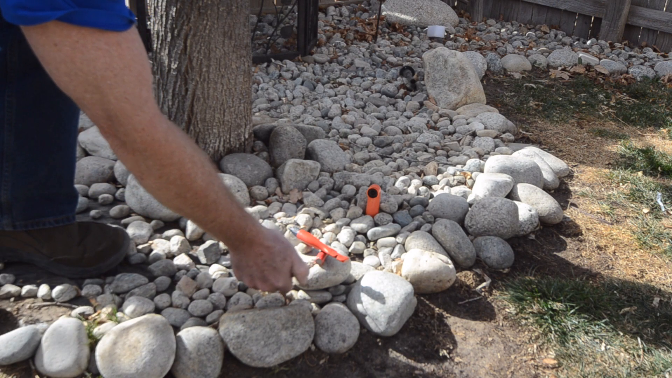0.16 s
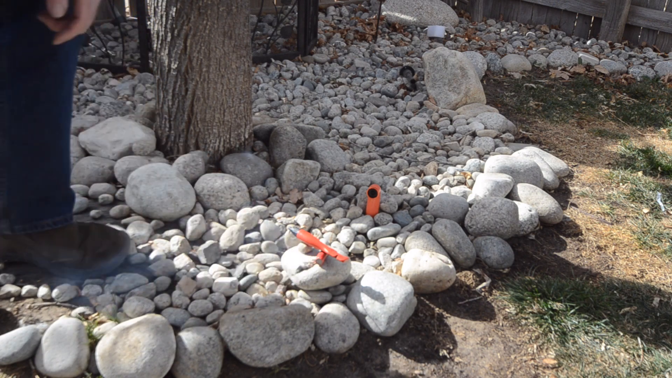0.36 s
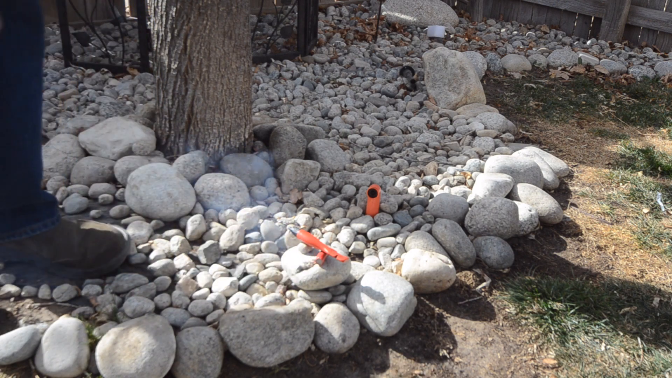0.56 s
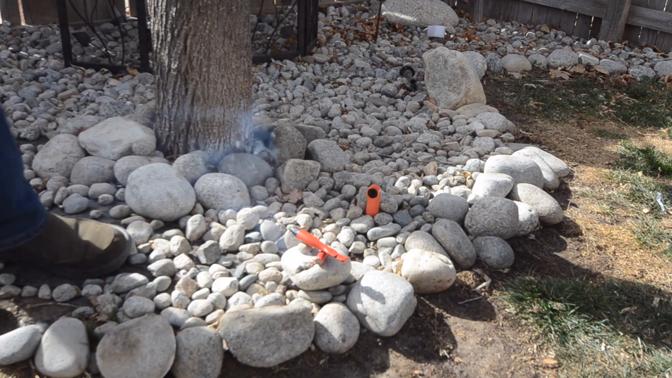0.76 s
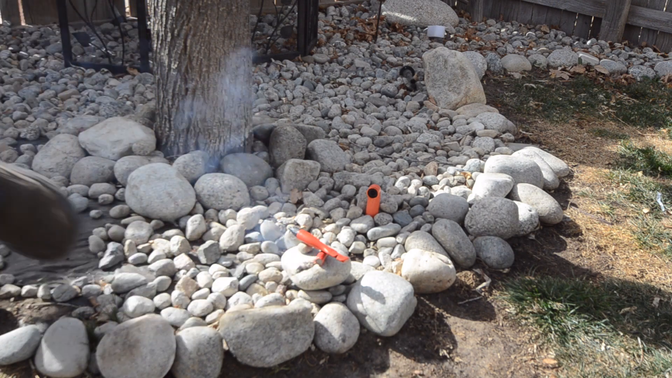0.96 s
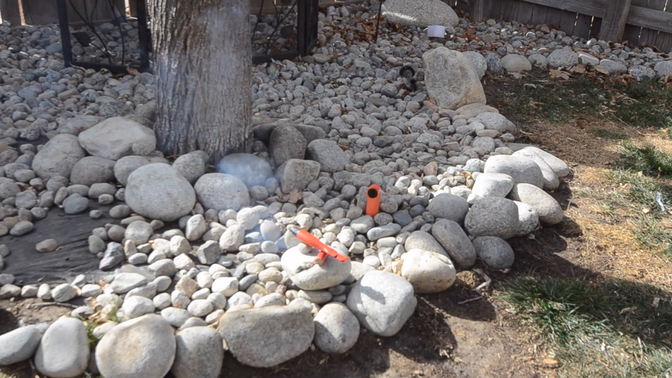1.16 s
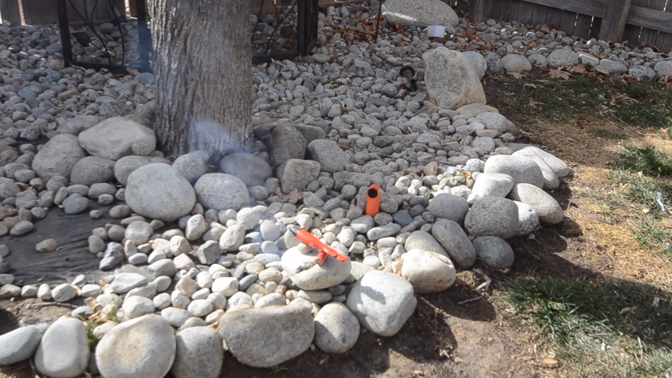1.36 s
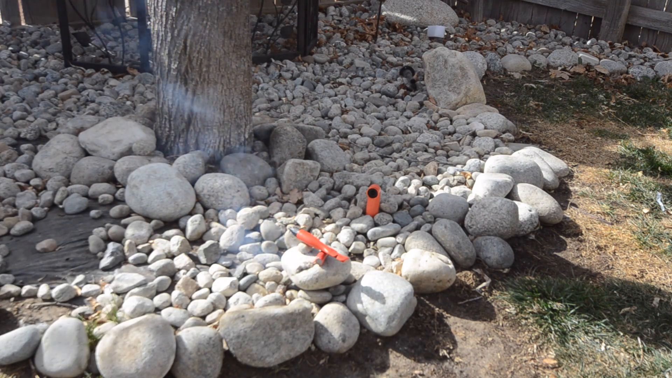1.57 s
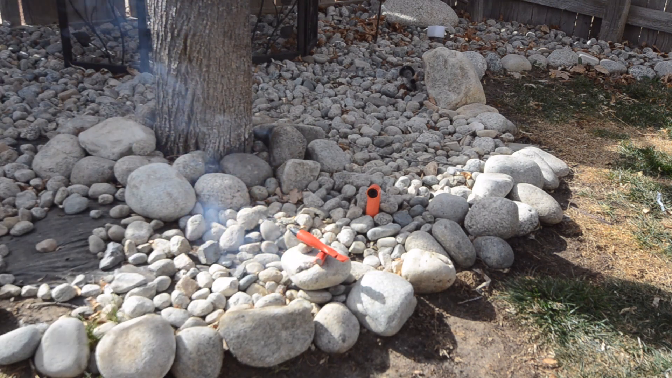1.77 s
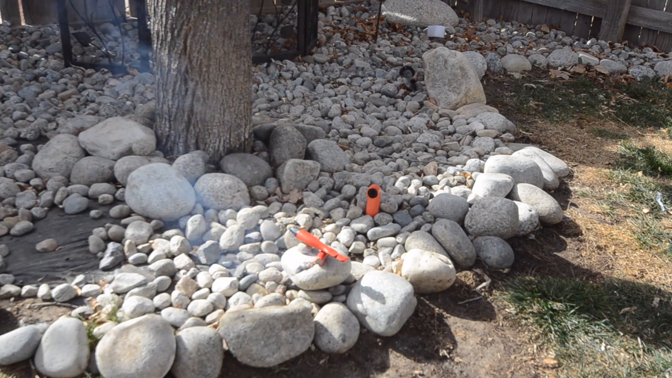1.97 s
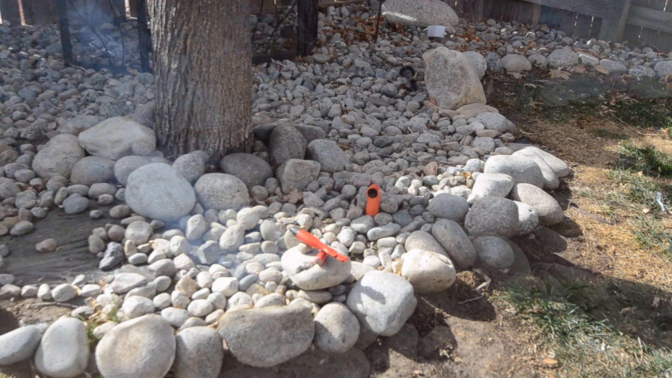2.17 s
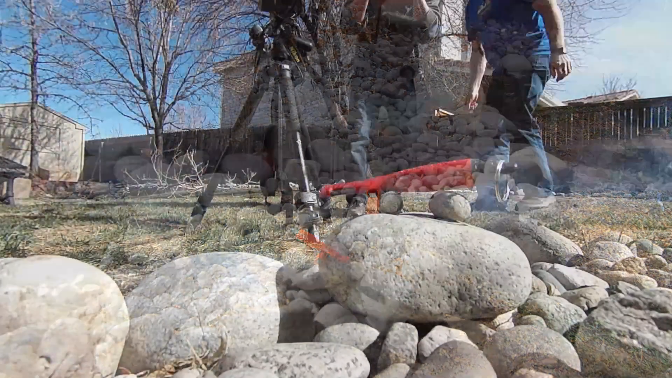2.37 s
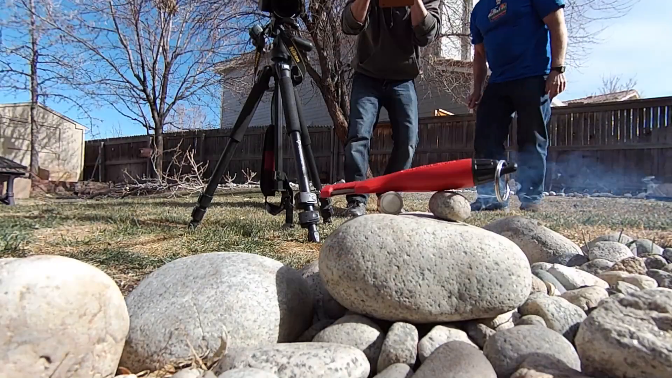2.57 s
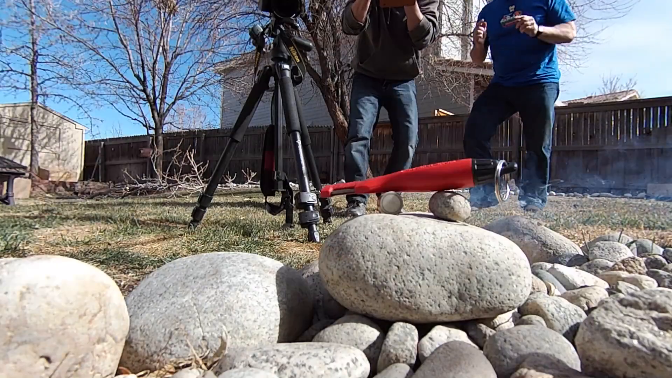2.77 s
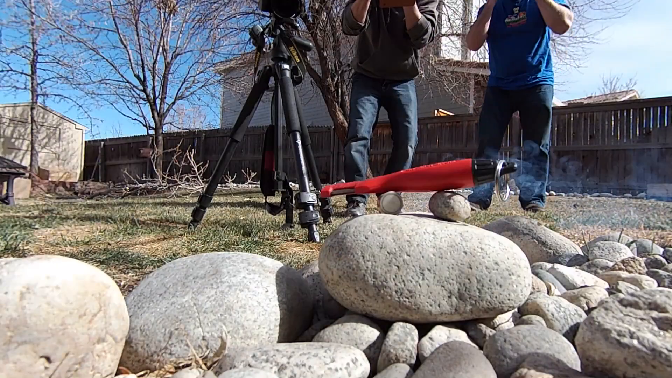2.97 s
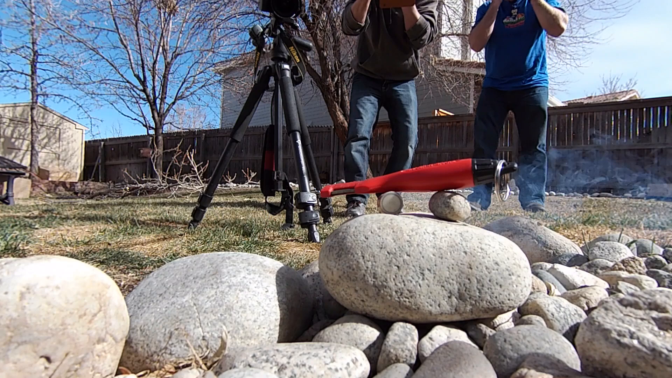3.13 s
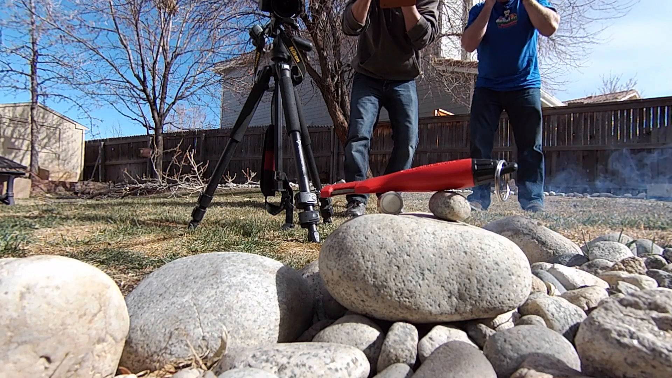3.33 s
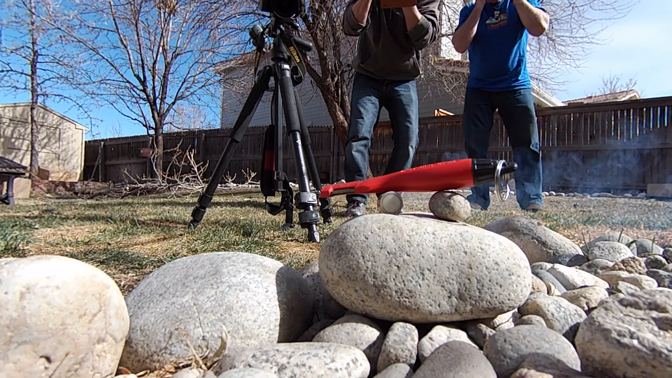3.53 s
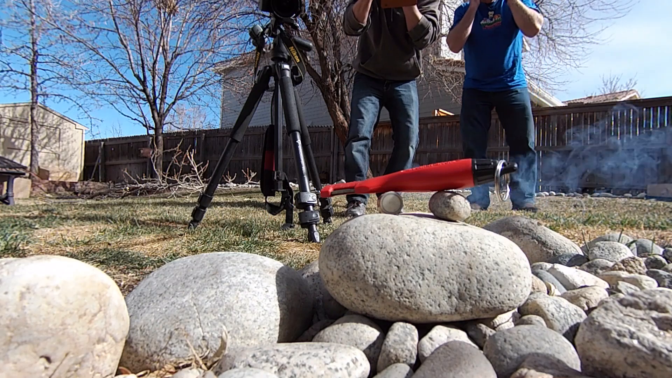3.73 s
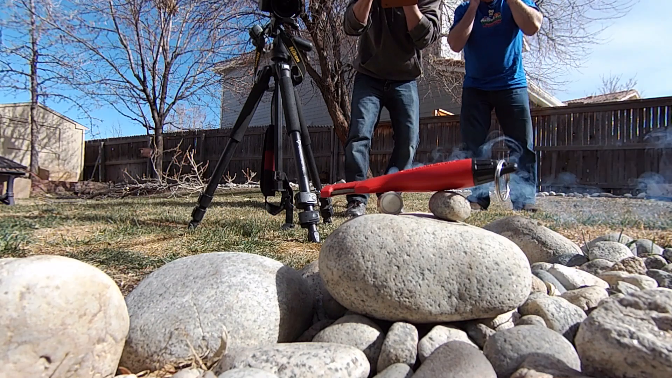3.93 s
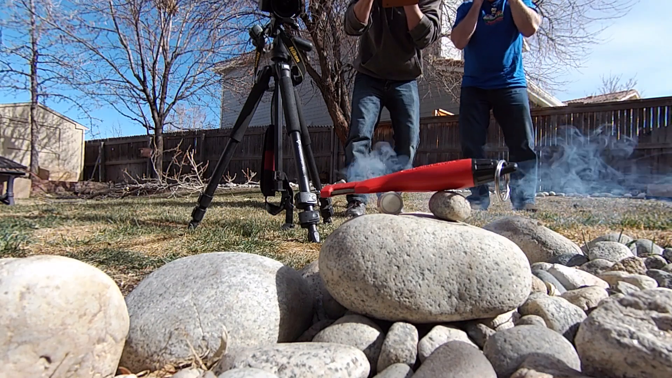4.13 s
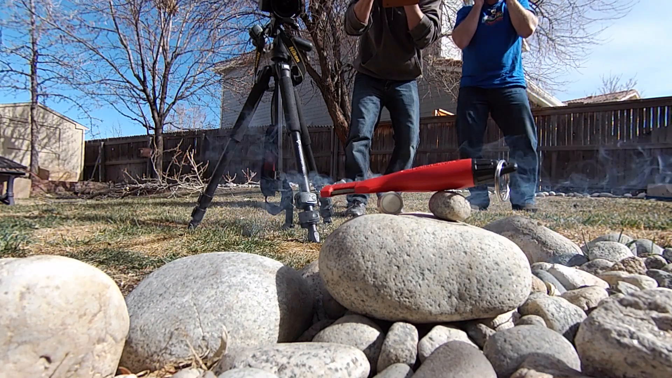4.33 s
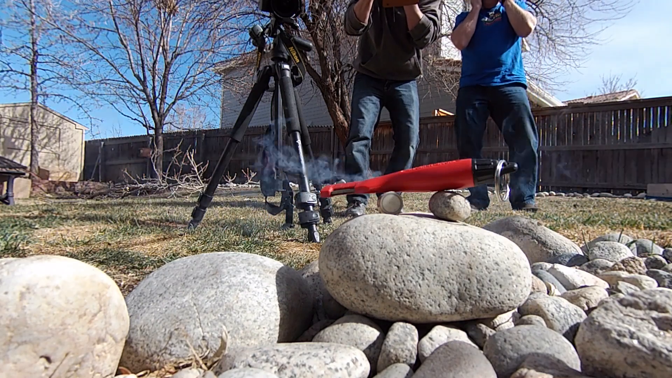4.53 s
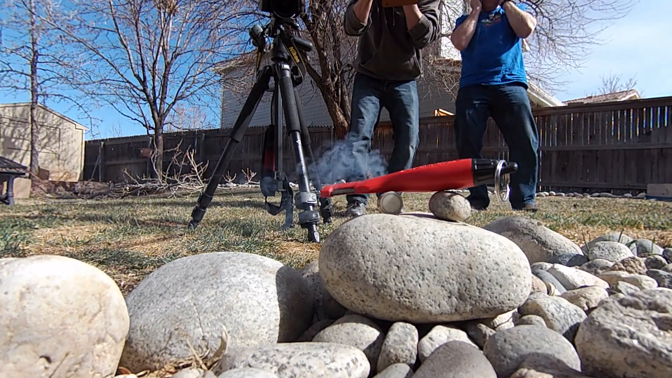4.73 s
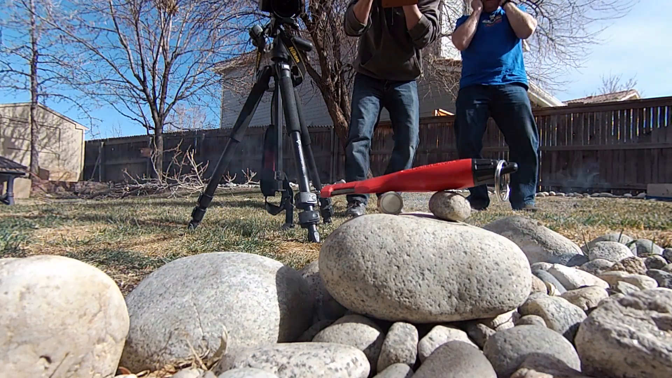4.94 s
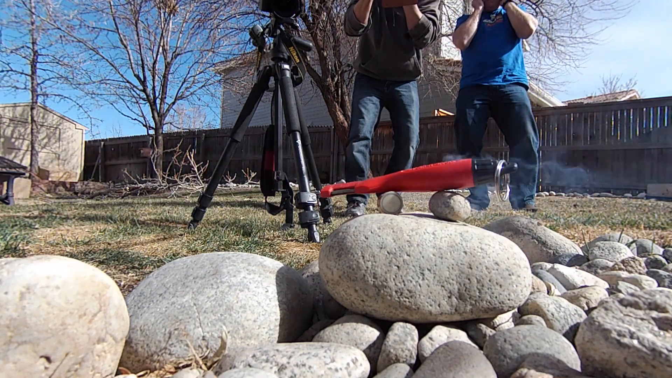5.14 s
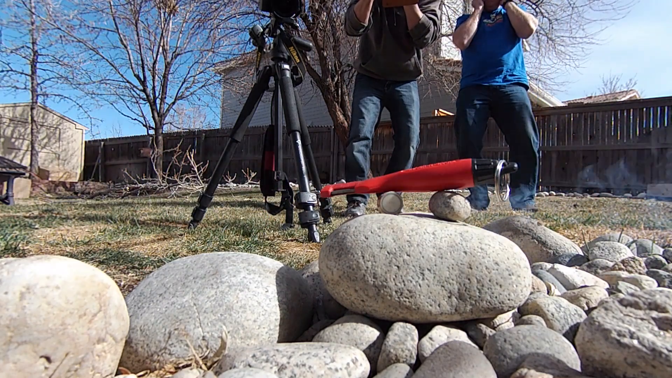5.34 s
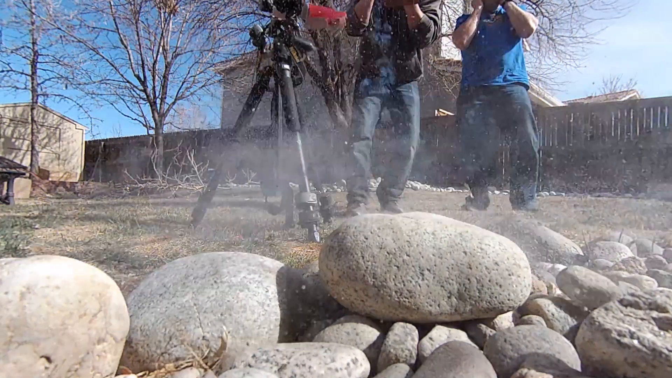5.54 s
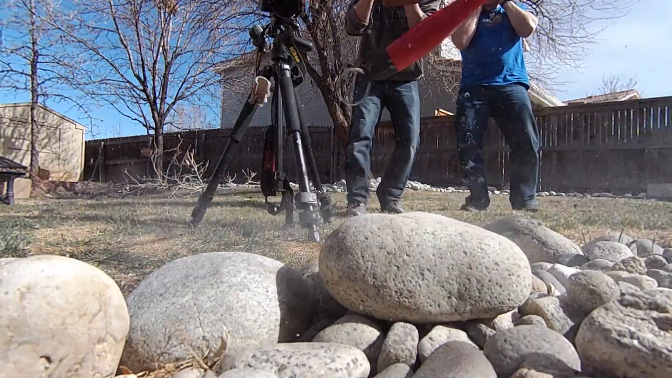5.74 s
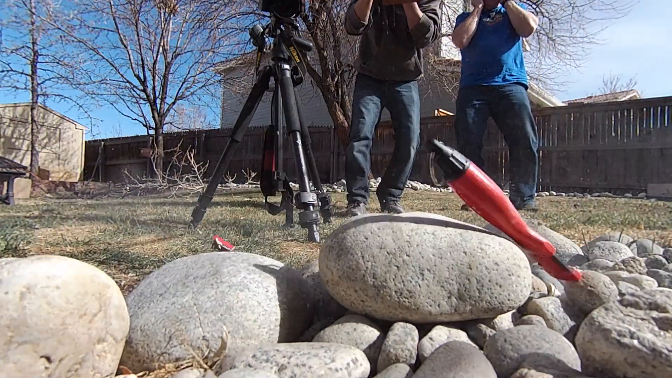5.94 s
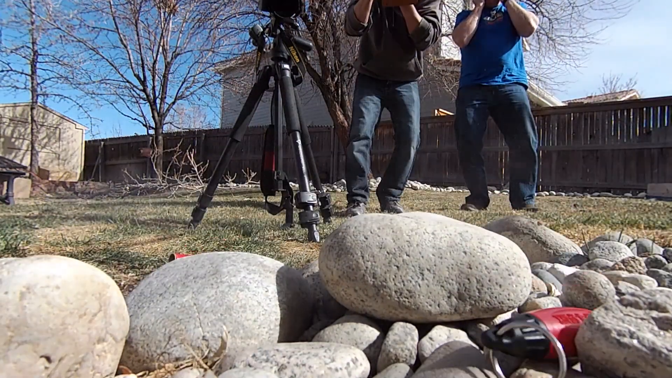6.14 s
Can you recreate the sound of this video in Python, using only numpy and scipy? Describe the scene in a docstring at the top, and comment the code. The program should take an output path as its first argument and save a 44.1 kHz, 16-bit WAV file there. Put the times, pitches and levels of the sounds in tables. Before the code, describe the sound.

A sizzling fuse turns muffled, then one sharp firecracker blast, followed by light clicks of splinters and a plastic housing landing.

```python
"""Firecracker in a plastic housing

A back yard, the microphone near a hollow plastic housing that lies on stones with a firecracker in it.
The fuse hisses in the open, burns on inside the housing and goes quiet, while wind bumps the microphone.
The bang overloads the microphone; then splinters rain down and the housing clatters onto the stones."""
import sys
import numpy as np
from scipy import signal
from scipy.fft import rfft, irfft
from scipy.io import wavfile
from scipy.ndimage import map_coordinates

SR = 44100
rng = np.random.default_rng(int(sys.argv[2]) if len(sys.argv) > 2 else 0)


def materialize(psi):
    """Save the field psi as 16-bit PCM at rate SR to the path in sys.argv[1].

    A 1-D psi becomes a single channel; in a 2-D psi each row is a channel.
    """
    bounded = np.clip(np.atleast_2d(psi).T, -1, 1)
    quanta = np.round(bounded * 32767).astype(np.int16)
    wavfile.write(sys.argv[1], SR, quanta)


N = 277830
TIME = np.arange(N) / SR
BANG_S = 5.4234


def from_db(db):
    """Decibels to gain."""
    return 10 ** (np.asarray(db) / 20)


def rms_one(x):
    """Scale to rms 1."""
    return x / np.sqrt(np.mean(x ** 2) + 1e-20)


def in_time(rows):
    """A curve through (seconds, value) points, sample by sample."""
    return np.interp(TIME, *np.transpose(rows))


def bump(s, length_s):
    """A smooth rise and fall of height 1 round a time."""
    return np.exp(-(2 * (TIME - s) / length_s) ** 2)


def ramp(s, length_s):
    """From 0 to 1, starting at a time."""
    return np.clip((TIME - s) / length_s, 0, 1)


def white():
    """White noise."""
    return rng.standard_normal(N)


def coloured(x, spectrum):
    """Give a steady noise a spectrum of (Hz, dB) points; rms 1."""
    hz, level_db = np.transpose(spectrum)
    bins = np.maximum(np.fft.rfftfreq(N, 1 / SR), 1)
    gain_db = np.interp(np.log(bins), np.log(hz), level_db, left=-60)
    return rms_one(irfft(rfft(x) * from_db(gain_db), N))


def low_pass(x, hz, order=2):
    """Butterworth low-pass."""
    return signal.sosfilt(signal.butter(order, hz, fs=SR, output="sos"), x + 1e-18)


def drift(hz):
    """A random wander, mostly slower than hz; rms 1."""
    return rms_one(low_pass(white(), hz))


def in_bands(x, bands, order=1):
    """Parallel band-passes of (Hz, width in Hz, dB), alternating in sign; rms 1."""
    out = np.zeros(N)
    for k, (hz, width, db) in enumerate(bands):
        band = signal.butter(order, [hz - width / 2, hz + width / 2], "band", fs=SR, output="sos")
        out += (-1) ** k * from_db(db) * signal.sosfilt(band, x)
    return rms_one(out)


def ring(clicks, hz, t60):
    """A unit click sets a sine of height 1 ringing."""
    r, w = from_db(-60 / (t60 * SR)), 2 * np.pi * hz / SR
    return signal.lfilter([0, np.sin(w)], [1, -2 * r * np.cos(w), r * r], clicks + 1e-18)


def add(out, s, sound):
    """Mix a short sound in at a time."""
    at = round(s * SR)
    out[at:at + len(sound)] += sound[:N - at]


def sparks(per_s, spread_db):
    """Powder grains pop at random with very uneven sizes; rms 1."""
    sizes = from_db(spread_db * np.minimum(rng.exponential(1, N), 5)) * rng.choice([-1, 1], N)
    return rms_one(sizes * (rng.random(N) < per_s / SR))


# Richer stretches of powder spurt. Each row: centre in seconds, length in seconds, full lift in dB.
SPURTS = [(2.014, 0.038, 2.5), (2.423, 0.084, 2.5), (2.854, 0.16, 1.5), (3.457, 0.0041, 7.5),
          (3.992, .06, 4), (4.12, 0.18, 6.5), (4.264, 0.027, 5), (4.384, .07, 3), (4.68, 0.25, 7.5),
          (4.946, 0.15, 7)]


def burn_db(levels, covered, catch_s=-0.017, attack_s=0.04, hold_s=0.035, fade_s=0.12, flare_s=0.053):
    """Level of one voice of the fuse as it catches, burns into the housing, is muffled and flares."""
    open_db, housed_db, tube_db, catch_db, pinch_db, flare_db, spurt_share = levels
    fading_s = np.maximum(TIME - catch_s - attack_s - hold_s, 0)
    catching = ramp(catch_s, attack_s) * np.exp(-fading_s / fade_s)
    pinched = bump(3.57, 0.43)   # the jet passes the hole in the housing's wall
    spurt_db = spurt_share * sum(db * bump(s, length_s) for s, length_s, db in SPURTS)
    steady_db = open_db + (housed_db - open_db) * covered
    free_db = steady_db + catch_db * catching + pinch_db * pinched + spurt_db
    sealed = ramp(4.975, 0.019)   # the flame slips into the cracker's own tube
    sealed_db = tube_db + flare_db * ramp(BANG_S - flare_s, flare_s)
    return free_db + (sealed_db - free_db) * sealed


# The sizzle in the open, the sizzle from inside the housing, and the finest fizz on top.
# Each row: frequency in Hz, level in dB.
SIZZLE_OPEN = [(1750, -22.5), (2100, -9), (2800, -13.5), (3150, -13), (3600, -8), (4000, -5.5), (4700, -7),
               (5500, -2.5), (6600, 0), (7200, -0.5), (8400, -1), (10100, -6.5), (11300, -9.5),
               (14000, -35.5)]
SIZZLE_COVERED = [(1800, -23.5), (2600, -2.5), (3250, -2), (3650, -1.5), (4100, 1.5), (4700, -3), (5600, 1),
                  (6700, -0.5), (7300, -3), (8700, -6), (9800, -14.5), (11500, -22), (14000, -43)]
FIZZ = [(9000, -28.5), (10300, -13), (11300, 0.5), (12200, -2), (13200, 0.5), (14500, -6), (16000, -10.5)]
# Each voice: level in dB in the open, in the housing and in the tube, dB added on catching,
# at the pinch and by the last flare, then its share of a spurt.
SIZZLE_LEVELS = (-36.5, -42.5, -48, 8.5, -2.5, 22, 1.0)
FIZZ_LEVELS = (-43, -64, -73.5, 2.5, 2, 42, 0.94)


def hiss(covered, fade_db_per_s=1.3, escape_db=1.5):
    """A gas jet full of popping grains; the housing dulls it once the flame is inside."""
    fizz_db = burn_db(FIZZ_LEVELS, covered ** 3.3) - fade_db_per_s * TIME   # shaded only when deep inside
    fizz_db += escape_db * covered * drift(hz=30)   # from there it escapes in flickers
    spits = from_db(-14) * sparks(per_s=26, spread_db=-3.0)   # now and then a coarse grain bursts
    jet = white() + 0.42 * sparks(per_s=1300, spread_db=4.5) + spits
    sizzle = rms_one((1 - covered) * coloured(jet, SIZZLE_OPEN) + covered * coloured(jet, SIZZLE_COVERED))
    return from_db(burn_db(SIZZLE_LEVELS, covered)) * sizzle + from_db(fizz_db) * coloured(jet, FIZZ)


# The flame in the open and inside the housing. Each row: frequency in Hz, level in dB.
ROAR_OPEN = [(60, -11), (300, -0.5), (600, 1.5), (830, -0.5), (1100, 2.5), (1300, -1.5), (1500, -7),
             (1720, -17.5), (2300, -34)]
ROAR_COVERED = [(60, -4), (300, -5.5), (550, -3.5), (800, -3.5), (1120, 1.5), (1300, 0), (1480, -6),
                (1660, -15.5), (2300, -33)]
# Its levels along the burn, in the same order as the sizzle's.
ROAR_LEVELS = (-40.5, -44, -52.5, 12, -5, 23, 0.36)


def roar(covered, inside_s=3.98, recede_db_per_s=7, flutter_db=0.87):
    """The low rush of burning gas, which recedes once the flame is past the housing's wall."""
    gas = white()
    flame = (1 - covered) * coloured(gas, ROAR_OPEN) + covered * coloured(gas, ROAR_COVERED)
    level_db = burn_db(ROAR_LEVELS, covered) - recede_db_per_s * np.maximum(TIME - inside_s, 0)
    return from_db(level_db + flutter_db * drift(hz=110)) * flame


# Hollow resonances close round the flame. Each row: frequency in Hz, width in Hz, level in dB.
HOLLOW_MODES = [(2309, 424, -4), (2784, 340, -2.5), (3425, 370, -9)]
# Their levels along the burn, in the same order as the sizzle's.
HOLLOW_LEVELS = (-49.5, -39.5, -49.5, 12, -0.5, 0, 0.19)


def hollow(covered, waver_db=1.12):
    """Gas and popping grains sound the hollow round the flame."""
    level_db = burn_db(HOLLOW_LEVELS, covered) + waver_db * drift(hz=11.4)
    jet = white() + 0.42 * sparks(per_s=900, spread_db=4.0)
    return from_db(level_db) * in_bands(jet, HOLLOW_MODES, order=2)


# How far the housing hides the flame from the microphone. Each row: time in seconds, share from 0 to 1.
COVERED = [(0, 0.16), (2.85, 0.01), (3.2, 0.41), (3.69, 0.71), (3.78, 1), (5.4, 0.89)]


def fuse(sputter_db=1.0):
    """The fuse burns until the bang; uneven burning shakes all of its voices at once."""
    covered = in_time(COVERED)
    sputter = from_db(sputter_db * drift(hz=44))
    burning = 1 - ramp(BANG_S - 0.004, 0.004)
    return burning * sputter * (hiss(covered) + roar(covered) + hollow(covered))


# The lighting hand, centimetres from the flame. Each row: starting distance in metres, share reflected.
HAND_REFLECTORS = [(0.029, 0.18), (0.103, 0.32)]


def past_hand(x, leaves_s=0.124, m_per_s=0.46, fade_s=0.11):
    """Echoes off the retreating fingers and arm sweep two combs down through the hiss."""
    away_s = np.maximum(TIME - leaves_s, 0)
    for distance_m, near_share in HAND_REFLECTORS:
        delay_s = 2 * (distance_m + m_per_s * away_s) / 343
        share = near_share * np.exp(-(away_s / fade_s) ** 2)
        echo = map_coordinates(x, [(TIME - delay_s) * SR], order=3)
        x = (x + share * echo) / np.sqrt(1 + share ** 2)
    return x


# Fixed peaks and dips that colour the fuse's hiss. Each row: frequency in Hz, width in Hz, gain in dB.
HISS_RIPPLE = [(3670, 110, -5.5), (4670, 120, -0.5), (5640, 180, 2), (6650, 230, 2.5), (7140, 150, -1.5),
               (7750, 300, 2), (9120, 240, 2), (9840, 340, -2), (10750, 280, 2), (13400, 700, -2)]


def ripple(x):
    """Some pitches of the hiss are lifted and others lowered."""
    bins = np.fft.rfftfreq(N, 1 / SR)
    ripple_db = sum(db * np.exp(-((bins - hz) / width) ** 2) for hz, width, db in HISS_RIPPLE)
    return irfft(rfft(x) * from_db(ripple_db), N)


# Wind rumble on the microphone, ducked after the bang and slowly coming back up.
# Each row: time in seconds, level in dB.
RUMBLE_LEVEL = [(0, -44), (3.9, -45), (4.4, -41), (4.9, -40), (5.05, -49), (5.37, -43), (5.8, -62),
                (6.05, -53), (6.3, -48.5)]
# Its colour. Each row: frequency in Hz, level in dB.
RUMBLE_COLOUR = [(20, -10), (45, 1), (90, 2), (150, -5), (250, -9), (400, -29), (900, -53)]
# Single buffets on the membrane. Each row: time in seconds, level in dB, rate of the swing in Hz.
BUFFETS = [(4.105, -25.5, 110), (4.337, -17.5, 100), (4.412, -27, 81), (4.427, -22.5, 98),
           (4.517, -24.5, 129), (4.530, -26, 70), (4.648, -19, 118), (4.805, -27.5, 100),
           (4.857, -27.5, 151), (4.939, -20.5, 119), (4.955, -20.5, 86), (4.975, -23, 150),
           (5.115, -30, 88), (5.185, -28, 129), (5.238, -24, 113), (5.321, -21.5, 140), (5.337, -22, 97),
           (5.4, -22, 130), (5.412, -26, 100), (6.026, -40, 140), (6.053, -28.5, 175), (6.197, -36.5, 100),
           (6.254, -29, 104)]


def wind(lumps_db=1.1, ragged=0.14):
    """Lumpy low turbulence; each larger eddy pushes the membrane and sucks it back."""
    out = from_db(in_time(RUMBLE_LEVEL) + lumps_db * drift(hz=15)) * coloured(white(), RUMBLE_COLOUR)
    t = TIME[:SR // 10]
    for s, db, hz in BUFFETS:
        phase = np.pi * (hz * t - 1)
        churn = ragged * rms_one(low_pass(rng.standard_normal(len(t)), hz=298, order=3))
        eddy = -2 * phase * np.exp(-phase ** 2) + churn * np.exp(-(phase / 2) ** 2)
        add(out, s - .5 / hz, from_db(db) * low_pass(eddy, hz=450, order=3))
    return out


# The open air all round the yard. Each row: frequency in Hz, level in dB.
AIR_COLOUR = [(20, 10.5), (200, 7.5), (500, 4), (1100, -7), (3000, -14.5), (6500, -12), (11000, -17),
              (16000, -22)]


def air():
    """A faint, steady outdoor rush."""
    return from_db(-63.5) * coloured(white(), AIR_COLOUR)


# On the ground, two pebbles shift early on and the larger splinters land after the bang.
# Each row: start in seconds, level in dB, pitch in Hz.
LANDINGS = [(1.167, -34, 1800), (1.405, -25, 4150), (5.7273, -35.5, 9000), (5.7827, -26.5, 4400),
            (5.783, -24.5, 9740), (5.7968, -30, 7400), (5.8287, -20.5, 7220), (5.8690, -37, 7550),
            (5.936, -31.5, 7800), (5.946, -36, 6000), (6.07, -23, 7200), (6.0724, -23.5, 9050),
            (6.1011, -23.5, 5970), (6.1320, -25, 5500), (6.1598, -35, 7200)]


def touches(hop_s=0.0043, hop_loss_db=10, pitch_scatter=0.15):
    """Each bit lands and hops once onto another edge; four crumbs sprinkle down. Gives (s, dB, Hz)."""
    def scattered(hz):
        return hz * np.exp(pitch_scatter * rng.uniform(-1, 1))
    hops = [(s + hop_s * rng.uniform(0.68, 1.3), db - hop_loss_db, scattered(hz))
            for s, db, hz in LANDINGS]
    crumbs = [(rng.uniform(5.8, 5.95), -38, scattered(6200)) for _ in range(4)]
    return list(LANDINGS) + hops + crumbs


# The modes of one splinter. Each row: multiple of its pitch, level in dB.
SPLINTER_MODES = [(.66, -13), (1, 2.5), (1.31, -13), (1.62, -15)]


def splinters(ring_t60=0.01, ring_db=-4.5, grit_db=-9.5, grit_t60=0.015):
    """Small hard bits on stone: a few short, high modes and a puff of grit for each touch."""
    out, click = np.zeros(N), signal.unit_impulse(SR // 10)
    grit = coloured(white(), [(500, 1), (2500, -15), (5000, 0.5), (9500, -1.5), (12000, -10), (16000, -21)])
    dying = from_db(grit_db - 60 * TIME[:len(click)] / grit_t60)
    for s, db, hz in touches():
        modes = sum(from_db(mode_db + ring_db) * ring(click, hz * k, ring_t60) * rng.choice([-1, 1])
                    for k, mode_db in SPLINTER_MODES)
        puff = dying * grit[round(s * SR):][:len(click)]
        add(out, s, from_db(db) * (modes + puff))
    return out - low_pass(out, hz=1200, order=1)


def stone_scatter(x, t60=0.11, wet_db=-14.0):
    """A short, thin scatter off the surrounding stones follows the direct sound to the microphone."""
    t = TIME[:SR // 4]
    scatter = rng.standard_normal(len(t)) * from_db(-60 * t / t60) * (t > .002)
    return x + from_db(wet_db) * signal.fftconvolve(x, scatter / np.linalg.norm(scatter))[:N]


# The pressure front and its strongest echoes. Each row: start in seconds, level in dB, push in seconds.
SHOCKS = [(5.4234, -0.5, 0.0097), (5.452, -5, 0.0044), (5.465, -4.5, .0015), (5.471, -8, 0.001)]


def shock_fronts():
    """Each front is a sudden push followed by a longer, weaker suction."""
    out = np.zeros(N)
    for s, db, push_s in SHOCKS:
        age = TIME[:SR // 5] / push_s
        add(out, s, from_db(db) * (1 - age) * np.exp(-age))
    return out


def blast_level(shape, yard_t60=0.24, distant_t60=1.7):
    """One voice of the blast swells to its crest, collapses, and lingers in near and distant echoes."""
    swell_s, swell_db, crest_db, release_t60, yard_db, distant_db = shape
    past_s = np.maximum(TIME - BANG_S - swell_s, 0)
    decays = ((crest_db, release_t60), (yard_db, yard_t60), (distant_db, distant_t60))
    power = sum(from_db(db - 60 * past_s / t60) ** 2 for db, t60 in decays)
    swell = from_db(swell_db * (ramp(BANG_S, swell_s) - 1))
    return (TIME > BANG_S) * swell * np.sqrt(power)


# The blast's bright snap and broad crack. Each row: frequency in Hz, level in dB.
SNAP_COLOUR = [(3000, -23), (6000, -4), (8500, -0.5), (11000, -2.5), (13500, -6), (16000, -5)]
CRACK_COLOUR = [(300, -10.5), (900, -2), (1500, 1), (2600, -1), (4200, 1.5), (5900, 1), (6800, 2),
                (7500, -6), (10500, -9.5), (13000, -16.5), (16000, -19.5)]
# Low noise bands that colour the boom. Each row: frequency in Hz, width in Hz, level in dB.
BOOM_BANDS = [(110, 120, -8), (196, 45, 1.5), (275, 70, -1.5), (364, 38, 2), (493, 80, 0), (596, 48, 0.5),
              (720, 166, -4.5)]
# Each voice: swell in seconds, swell in dB, crest in dB, seconds to fall 60 dB,
# yard echo in dB, distant echo in dB.
SNAP_SHAPE = (0.0378, 5.5, -7.5, 0.0963, -23, -63.5)
CRACK_SHAPE = (0.0582, 4.5, -5, 0.0544, -18.5, -52)
BOOM_SHAPE = (0.0542, 17, -5, 0.07, -19.5, -49.5)


def blast(return_s=0.31, return_db=-56.5):
    """A dense snap, crack and boom scattered by stones, fence and house."""
    clumps = from_db(0.84 * drift(hz=210))   # echoes arrive in bunches
    snap = blast_level(SNAP_SHAPE) * coloured(white(), SNAP_COLOUR)
    crack = blast_level(CRACK_SHAPE) * coloured(white(), CRACK_COLOUR)
    far_return = from_db(return_db) * bump(BANG_S + return_s, length_s=0.09)   # back off far houses
    boom = (blast_level(BOOM_SHAPE) + far_return) * in_bands(white(), BOOM_BANDS)
    return clumps * (snap + crack) + boom


# The housing comes down on the stones. Each row: start in seconds, level in dB, contact cut-off in Hz.
KNOCKS = [(5.8606, -26, 2900), (5.8963, -25, 2000), (5.9304, -31.5, 2700), (5.9653, -40, 3500),
          (6.0107, -47, 2800), (6.0714, -14.5, 1650), (6.1139, -14.5, 12000), (6.1290, -20.5, 2610),
          (6.1588, -36.5, 4200)]
# The modes of its shell. Each row: frequency in Hz, level in dB, seconds to fall 60 dB.
SHELL_MODES = [(900, -34, 0.064), (1637, -12.5, 0.036), (1880, -17, 0.027), (2800, -39, .03),
               (3565, -7.5, 0.027), (4540, -24, .012), (5100, -0.5, 0.013), (5770, -6, 0.01),
               (7250, -27, .025), (8400, -11, .007), (9300, -11, .007), (11300, -12, .009)]


def housing(scuff_db=-23.0, scuff_t60=0.014):
    """Each knock rings the plastic shell and scuffs the stone; softer contacts favour the low modes."""
    out, t, count = np.zeros(N), TIME[:SR // 5], len(SHELL_MODES)
    for s, db, contact_hz in KNOCKS:
        scuff = rng.normal(0, 0.5, len(t)) * from_db(scuff_db - 60 * t / scuff_t60)
        push = from_db(db) * low_pass(signal.unit_impulse(len(t)) + scuff, contact_hz)
        # the spot that is struck sets each mode's strength and sign, the stone under it pulls its pitch
        strengths = from_db(rng.standard_normal(count)) * rng.choice([-1, 1], count)
        detunes = 1 + .006 * rng.standard_normal(count)
        for strength, detune, (hz, mode_db, t60) in zip(strengths, detunes, SHELL_MODES):
            add(out, s, strength * from_db(mode_db) * ring(push, hz * detune, t60))
    return out - low_pass(out, hz=700, order=1)   # a small shell radiates little bass


def scene():
    """Outdoor air, fuse, wind, bang and falling debris at one microphone in the yard."""
    fuse_outdoors = air() + ripple(past_hand(fuse())) + wind()
    bang = shock_fronts() + blast()
    debris = stone_scatter(housing() + splinters())
    return (fuse_outdoors + bang + debris)[None]


def record(dry, ceiling=0.45, cutoff_hz=15800):
    """The microphone overloads hard on the bang; the highest treble is cut."""
    clipped = dry / (1 + (dry / ceiling) ** 6) ** (1 / 6)
    return signal.fftconvolve(clipped, signal.firwin(301, cutoff_hz, fs=SR)[None], "same")


dry = scene()
out = record(dry)
materialize(out)
```